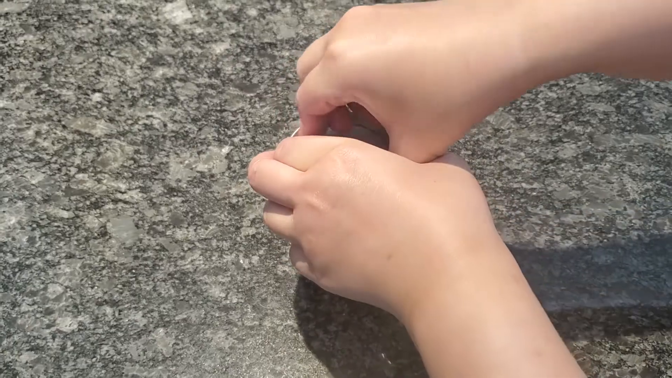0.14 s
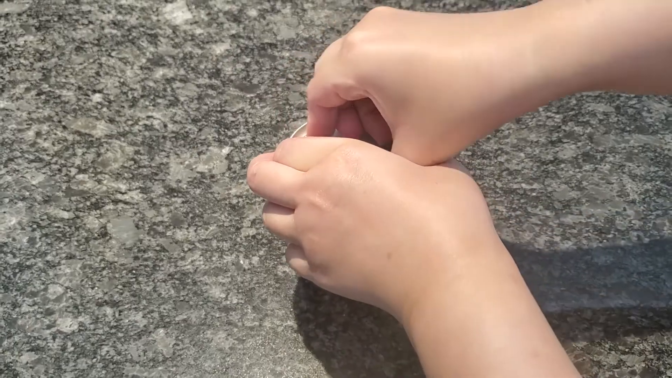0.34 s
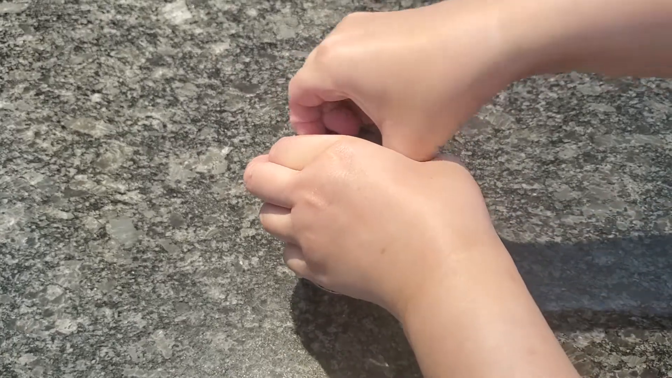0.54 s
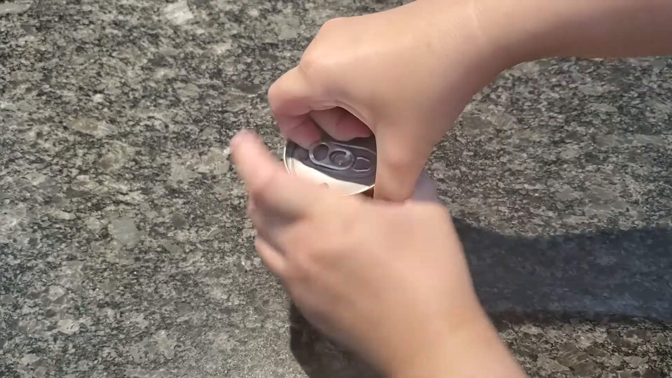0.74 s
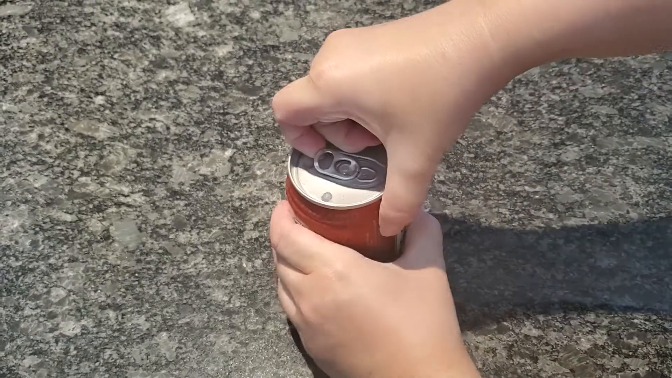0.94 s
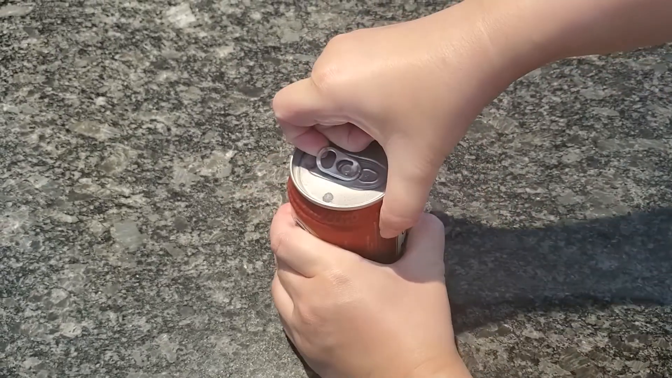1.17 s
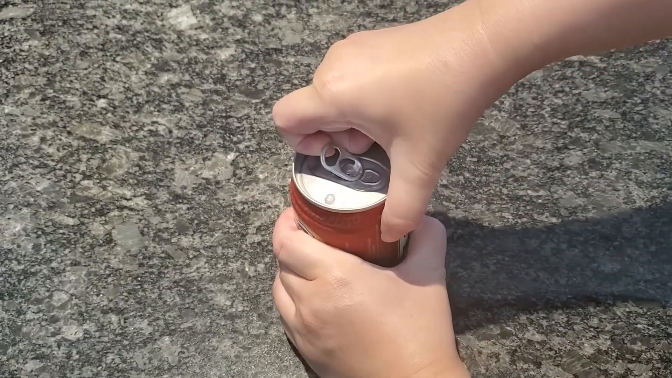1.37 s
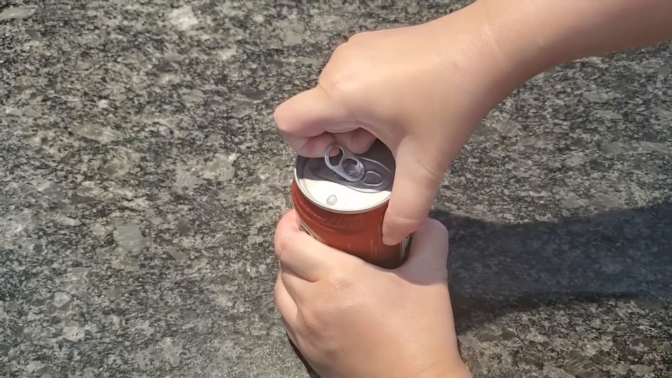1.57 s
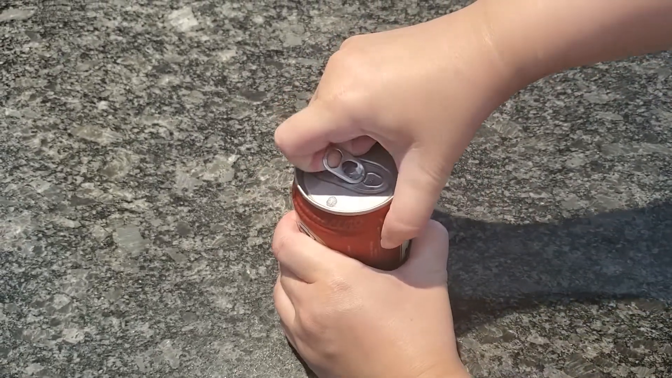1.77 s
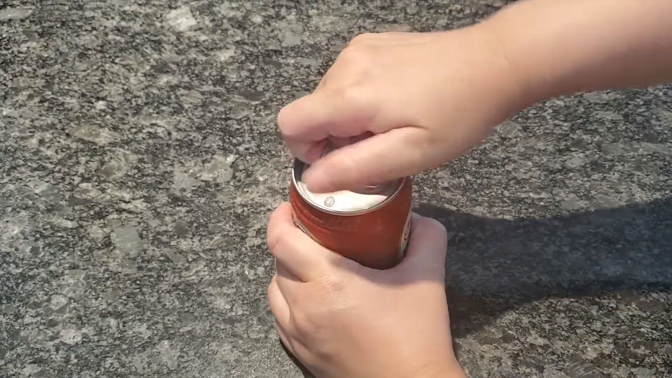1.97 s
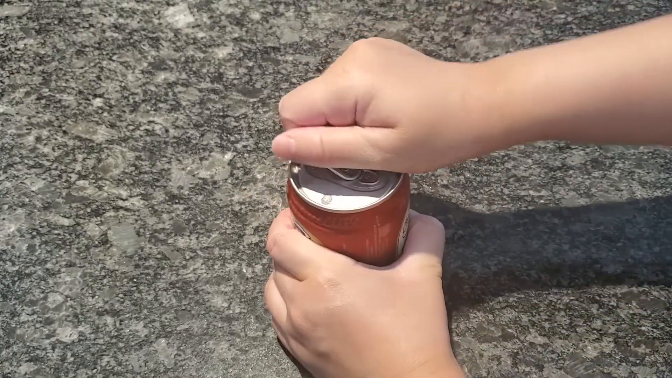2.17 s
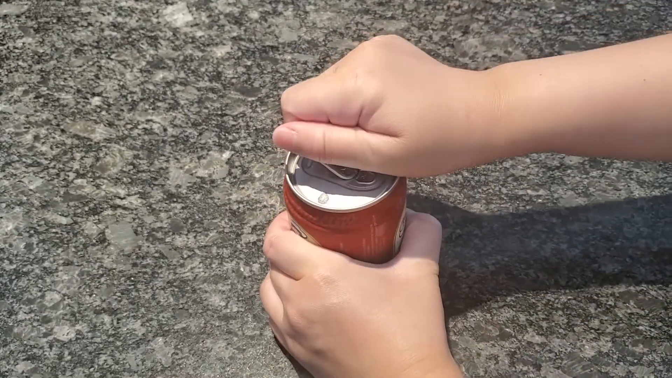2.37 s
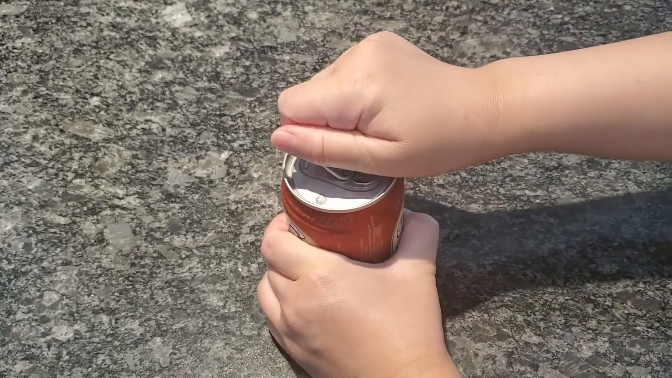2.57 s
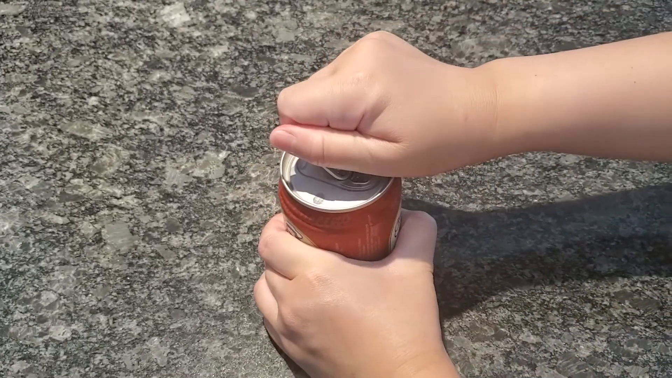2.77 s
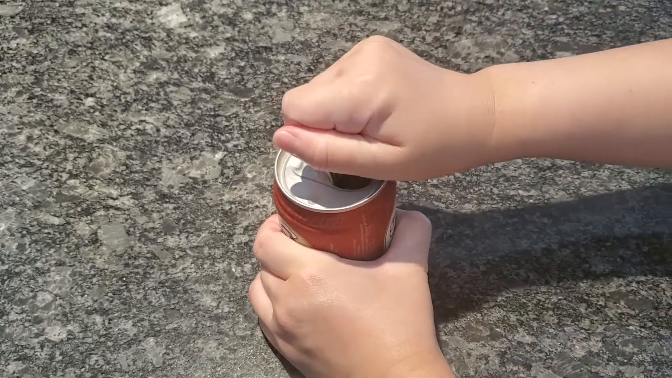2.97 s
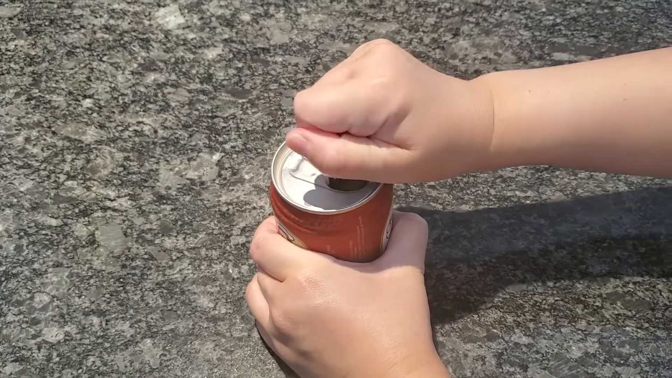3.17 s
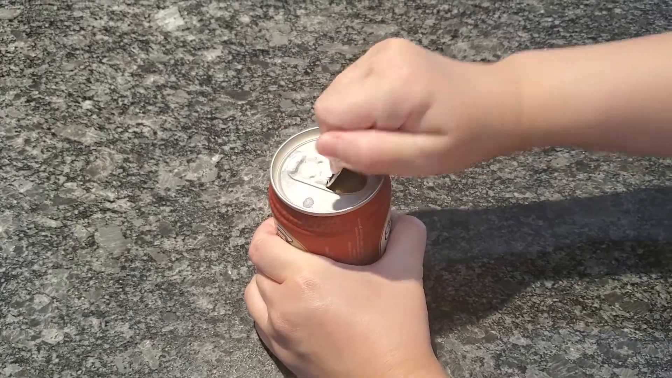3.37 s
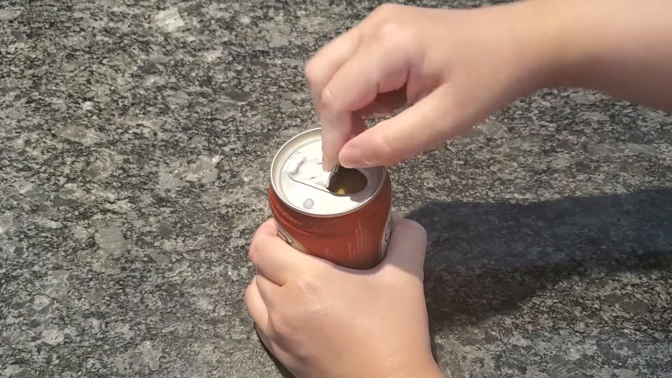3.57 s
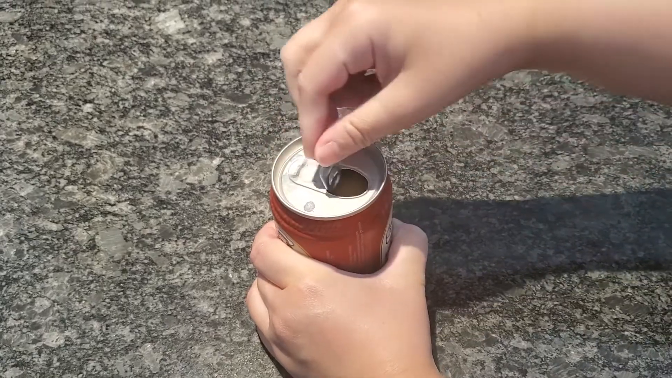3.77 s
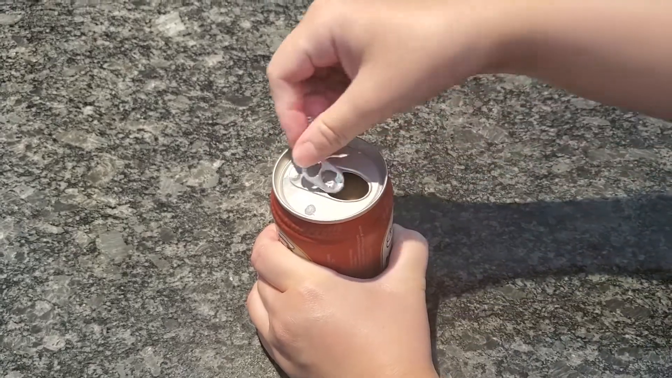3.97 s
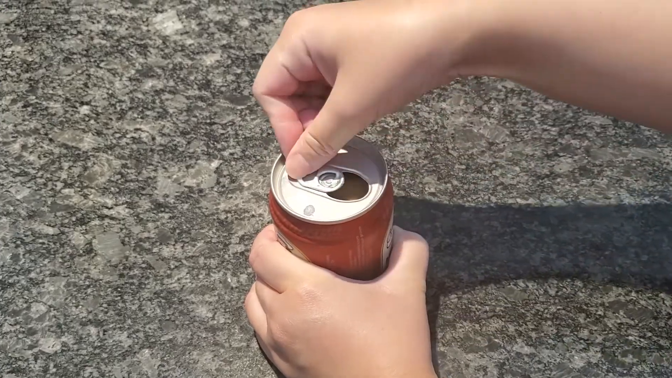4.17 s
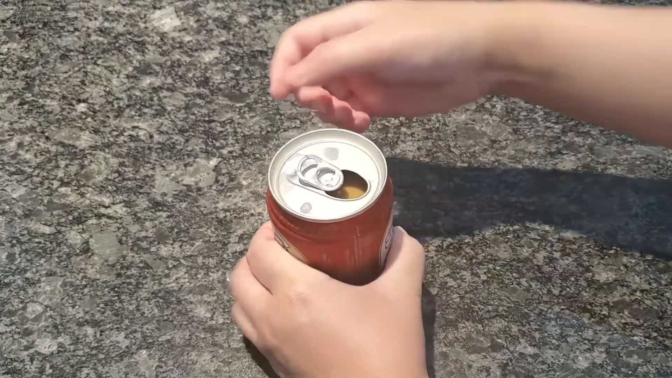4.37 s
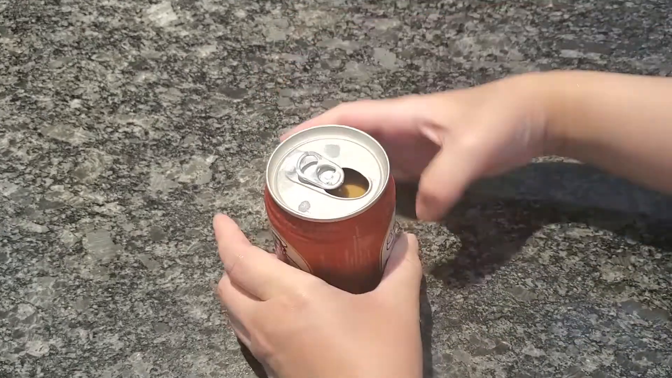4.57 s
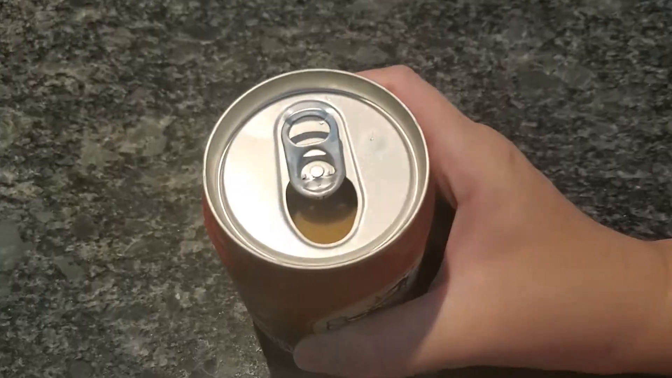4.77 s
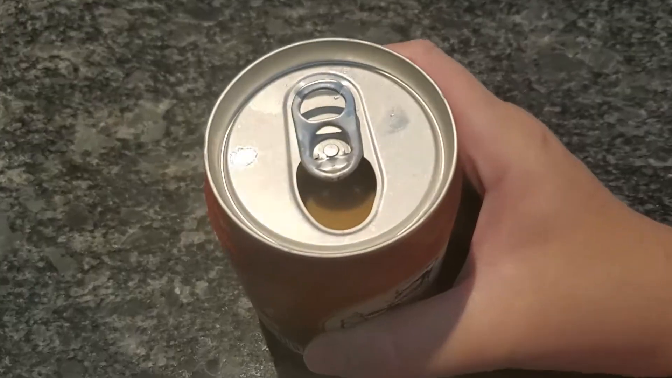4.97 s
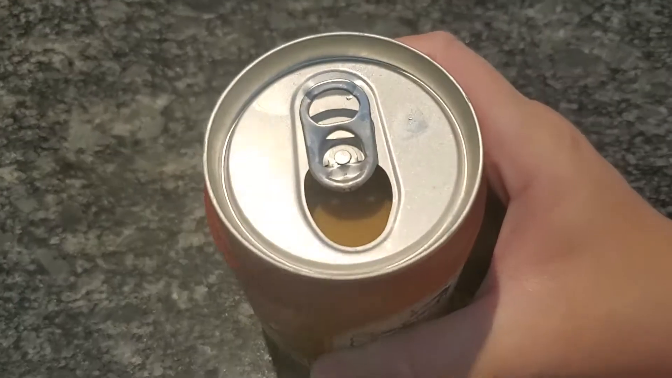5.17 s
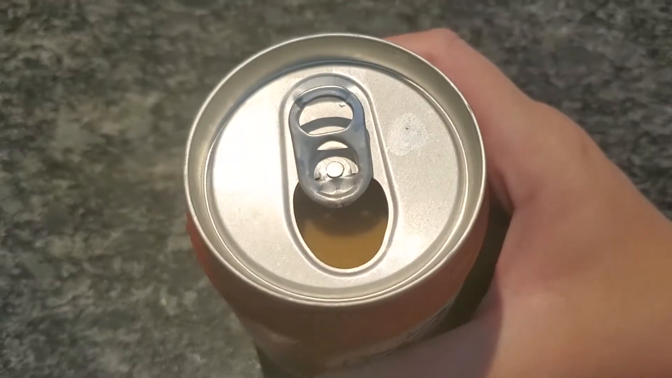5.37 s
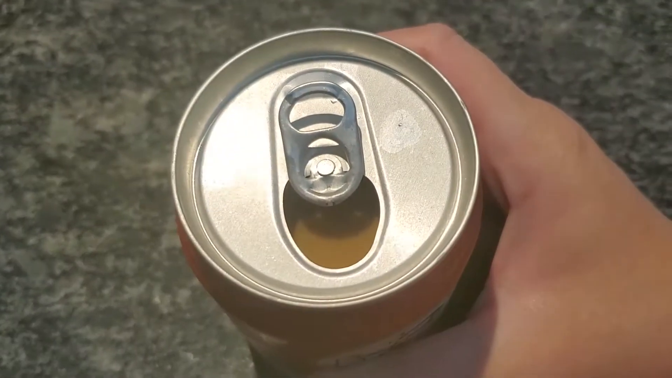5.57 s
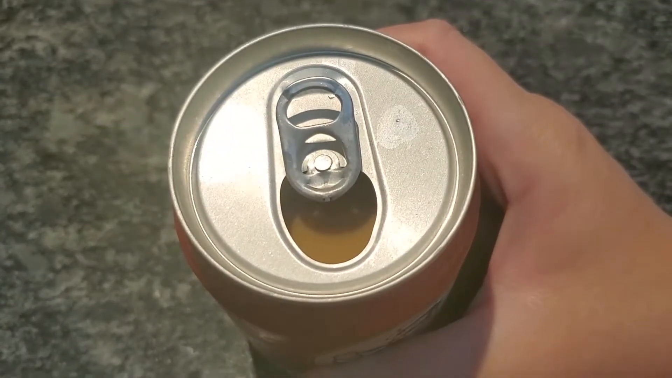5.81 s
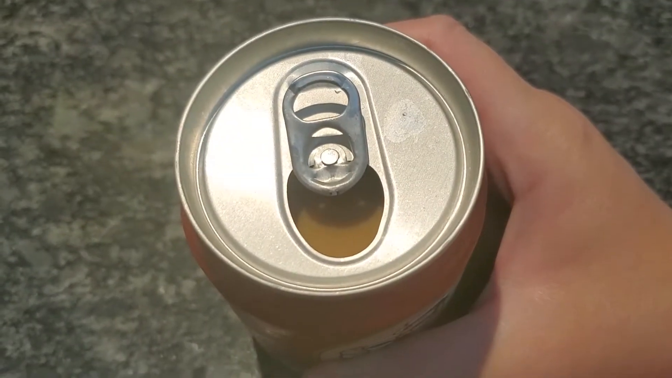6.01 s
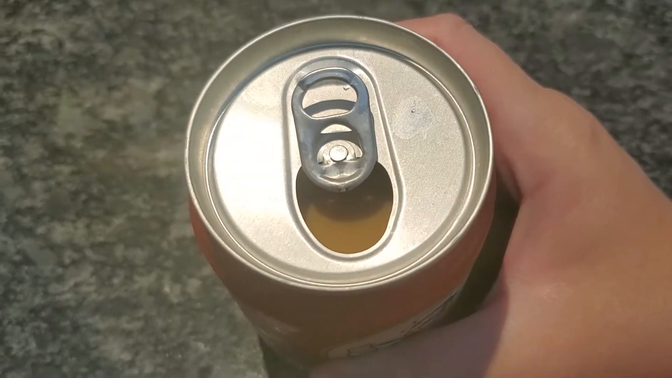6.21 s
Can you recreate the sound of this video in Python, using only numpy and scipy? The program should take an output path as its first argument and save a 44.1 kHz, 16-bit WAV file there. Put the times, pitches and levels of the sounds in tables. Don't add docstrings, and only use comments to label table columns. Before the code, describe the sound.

A drink can is opened close up: nail ticks on the tab, a sharp pop with a brief gas spit, crackling metal tear, then faint ticks over a low drone.

```python
import sys
import numpy as np
from scipy import signal
from scipy.fft import rfft, irfft, next_fast_len
from scipy.io import wavfile
from scipy.ndimage import map_coordinates

SR = 44100
rng = np.random.default_rng(int(sys.argv[2]) if len(sys.argv) > 2 else 0)


def gain_from_decibels(decibels):
    exponent = np.asarray(decibels, float) / 20
    return 10 ** exponent


def wav_out(sig):
    wavfile.write(sys.argv[1], SR, np.round(np.clip(np.atleast_2d(sig).T, -1, 1) * 32767).astype(np.int16))


N = 275437

# pitch_hz, lead [radians]
PORT_LEAD = [(200, 0), (340, -.3), (600, -2), (1200, -4)]


def unit(x):
    return x / np.sqrt(np.mean(x ** 2) + 1e-20)


def along(points, hz):
    f, v = np.transpose(points)
    return np.interp(np.log(hz + 1), np.log(f + 1), v)


def curve(rows, column):
    rows = np.array(rows)
    return np.interp(np.arange(N) / SR, rows[:, 0], rows[:, column])


def wobble(rate):
    coarse = np.arange(0, N + 16, 16)
    knots = rng.standard_normal(int(N * rate / SR) + 4)
    return np.interp(np.arange(N), coarse, map_coordinates(knots, [coarse * rate / SR]))


def swell(peak_s, rise_s, fade_s):
    t = np.arange(N) / SR - peak_s
    return -20 * np.where(t < 0, -t / rise_s, t / fade_s)


def filtered(x, response):
    m = next_fast_len(N + SR // 2)
    return irfft(rfft(x, m) * response(np.fft.rfftfreq(m, 1 / SR)), m)[..., :N]


def modes(table, flip=-1):
    def response(f):
        total = 0
        for k, (hz, width, db) in enumerate(table):
            total = total + flip ** k * gain_from_decibels(db) * 1j * f * width / (hz * hz - f * f + 1j * f * width)
        return total
    return response


def coloured(points):
    return lambda hz: gain_from_decibels(along(points, hz))


def narrow(hz, width):
    return lambda f: 1 / (1 + ((f - hz) / width * 2) ** 2)


def noise(gain, alike):
    def spread(hz):
        turn = np.arccos(np.clip(along(alike, hz), -1, 1)) / 2
        return gain(hz) * [np.cos(turn), np.sin(turn)]

    mid, side = filtered(rng.standard_normal((2, N)), spread)
    stereo = np.array([mid + side, mid - side])
    return unit(filtered(stereo, lambda hz: np.exp(1j * np.outer([1, 0], along(PORT_LEAD, hz)))))


def contacts(events, body, length, edge_db, ring, apart, pan_db, snap=1.1, detune=.035, flip=-1):
    low_apart = .45
    dull_hz = 15000
    out, t = np.zeros((2, N + SR)), np.arange(2048) / SR
    hz = np.fft.rfftfreq(len(t), 1 / SR)
    low_modes = [m for m in body if m[0] <= 7000]
    edge_modes = [m for m in body if m[0] > 7000]
    port_spread = apart * np.reshape([low_apart, 1], (2, 1, 1))
    for s, db, tone_hz, tone_db in events:
        rough = rng.standard_normal((3, len(t)))
        bent = hz * (1 + detune * rough[0, 0])
        upper = np.array([modes(group, flip)(bent) for group in (low_modes, edge_modes)])
        upper = upper / (1 + 1j * hz / dull_hz) ** 2
        rough[0, :6] = [snap, 0, 0, 0, 0, 0]
        force = (rough[0] + port_spread * rough[1:]) * gain_from_decibels(-60 * t / length)
        parts = irfft(rfft(force) * upper[:, None])
        parts[..., -256:] = 0
        parts /= np.abs(parts).max(axis=(1, 2), keepdims=True)
        age = t / (ring * length)
        bloom = (age * np.exp(1 - age)) ** 1.6
        tone = bloom * np.sin(2 * np.pi * tone_hz * t + 0.092 * rough[1:, :1]) * gain_from_decibels([[pan_db], [-pan_db]])
        hit = parts[0] + gain_from_decibels(edge_db) * parts[1] + gain_from_decibels(tone_db) * tone
        out[:, round(s * SR):][:, :len(t)] += gain_from_decibels(db) * hit
    return out[:, :N] * gain_from_decibels([[pan_db / 2], [-pan_db / 2]])


def plucks():
    # start_s, peak level_db, lid pitch_hz, tone level_db
    nail_hits = [(.002, -47, 1660, 6), (.008, -69.5, 840, 15), (.013, -42.5, 1750, 1.5),
                 (.2815, -52, 6300, 0), (.2852, -44.5, 1610, 1.5), (.2875, -47.5, 810, 0),
                 (.291, -43.5, 1760, 8.5), (.381, -62, 1790, 12.5), (.6275, -49, 1790, 6),
                 (.6285, -60.5, 2560, 8.5), (.632, -56.5, 3317, 2.5), (1.029, -71, 4930, 10.5),
                 (1.058, -66, 1636, 4.5), (1.06, -73.5, 925, 14)]
    # pitch_hz, width_hz, level_db
    shut_lid = [(2250, 400, -6), (2840, 110, -3), (3300, 610, -5), (3533, 260, 2), (4470, 510, -9.5),
                (5950, 630, -4.5), (6600, 670, -0.5), (8400, 700, -4), (10200, 620, 4.5),
                (11390, 2300, -1.5), (14345, 870, -6.5)]
    return contacts(nail_hits, shut_lid, 0.007, edge_db=-2.5, ring=0.21, apart=0.69, pan_db=-0.8)


def squeal(db, pitch):
    t = np.arange(N) / SR
    fade_s, blur_hz = 0.0086, 90
    fade = np.clip(np.minimum(t - pitch[0][0], pitch[-1][0] - t) / fade_s, 0, 1)
    return fade * gain_from_decibels(db) * np.sin(2 * np.pi * np.cumsum(curve(pitch, 1) + blur_hz * wobble(300)) / SR)


def skin():
    # firmest grip start_s, rustle level_db, wall ring level_db, rise_s, fade_s (for 20 dB)
    strokes = [(0, -53.5, -81, .1, 0.095), (.3, -59, -68.5, 0.071, 0.11), (.72, -72, -100, 0.19, 0.19),
               (0.831, -59, -64, 0.067, 0.052), (1.712, -58.5, -82, 0.015, 0.09),
               (1.799, -76, -77.5, 0.11, 0.21), (2.069, -73.5, -90, 0.047, .4),
               (2.22, -72, -72.5, 0.1, 0.14), (3.64, -77, -102, 0.22, 0.57),
               (4.06, -67.5, -69, 0.023, 0.089), (4.25, -73, -83, 0.14, 0.11),
               (4.48, -78.5, -84, 0.22, 0.27), (4.59, -78, -94, 0.28, 0.071), (5.05, -78.5, -86, 0.19, .5)]
    # pitch_hz, level_db
    skin_colour = [(500, -12), (900, -0.5), (1400, 1.5), (1750, -2), (2100, -8), (2900, -11.5), (3500, -14),
                   (5000, -14), (9000, -19.5), (12600, -18.5), (14500, -15.5), (16000, -18.5)]
    # (start_s, pitch_hz)
    squeak_paths = [
        (-65, [(.6, 14800), (.612, 15000), (.635, 15080), (.655, 15320), (.685, 15100), (.705, 15150), (.72, 15500)]),
        (-71, [(.945, 15200), (.968, 14950), (.977, 14600)]),
        (-77, [(5.1, 12250), (5.13, 13100), (5.17, 13700), (5.19, 13400), (5.23, 13450), (5.32, 12950), (5.39, 12700), (5.415, 12800), (5.48, 12300)]),
        (-88, [(5.15, 5100), (5.25, 5250), (5.4, 5100)]),
        (-76, [(5.115, 8550), (5.14, 9000), (5.18, 9200)]),
        (-76, [(5.19, 9550), (5.21, 9850), (5.245, 9970), (5.3, 9600), (5.355, 8900)]),
    ]
    rustle, ring = 0, 0
    for s, rustle_db, ring_db, rise_s, fade_s in strokes:
        grip = gain_from_decibels(swell(s, rise_s, fade_s))
        rustle = rustle + gain_from_decibels(rustle_db) * grip
        ring = ring + gain_from_decibels(ring_db) * grip
    rub = rustle * noise(coloured(skin_colour), [(1000, 1.0)]) + ring * noise(narrow(2530, 330), [(1000, 0.67)])
    brush = gain_from_decibels(-66 + swell(.815, rise_s=.5, fade_s=.07))
    rub = rub + brush * noise(narrow(12500, 5000), [(1000, .4)])
    squeak = gain_from_decibels(3.9 * wobble(63)) * sum(squeal(*row) for row in squeak_paths)
    return gain_from_decibels(1.1 * wobble(83)) * rub, squeak * gain_from_decibels([[1.2], [-1.2]])


def hum(hz, wander, db):
    turn = 2 * np.pi * np.cumsum(hz + wander / 3 * wobble(13)) / SR + np.outer([1, 0], along(PORT_LEAD, hz))
    unsteady_db = .6 * wobble(15) + 1.8 * np.array([wobble(7), wobble(7)])
    return gain_from_decibels(db + 5.5 + unsteady_db) * np.sin(turn)


def whine(s, hz, db, fade_s):
    rise_s, wander_hz = .25, 22
    return gain_from_decibels(db + swell(s, rise_s, fade_s)) * np.sin(2 * np.pi * np.cumsum(hz + wander_hz * wobble(56)) / SR)


def background():
    # start_s, level_db
    load = [(0, 0), (.6, -1.5), (1.1, 0), (1.7, -2), (2.2, -3), (2.8, 1), (3.3, -3.5), (3.9, -4.5),
            (4.4, -1), (6.25, -2.5)]
    # pitch_hz, level_db
    rumble_colour = [(15, -65), (25, -38.5), (48, -14.5), (157, -12.5), (183, -3.5), (217, -13),
                     (284, -4.5), (321, -6), (353, -4.5), (387, -10), (426, -11.5), (461, -16), (620, -20),
                     (810, -57), (1360, -120)]
    # pitch_hz, wander_hz, rms level_db
    hum_tones = [(61.5, 7.3, -78.5), (140, 22, -74.5), (192, 7, -66.5), (241.3, 9.9, -72),
                 (291, 5.5, -70.5), (356.3, 3.3, -61), (376, 2, -73.5), (419, 7, -69), (452, 6.6, -78.5),
                 (718, 5.8, -71), (947, 19, -87.5), (980, 7.6, -87), (1190, 40, -75), (1285, 2.3, -85.5)]
    # pitch_hz, level_db
    whirr_colour = [(260, -34), (450, -3.5), (760, -9.5), (972, -11), (1060, -17.5), (1220, -18.5),
                    (1240, -24), (2200, -41.5), (2860, -68.5), (4840, -120)]
    # start_s, pitch_hz, level_db, fade_s (for 20 dB)
    whine_tones = [
        (4.47, 3500, -85, .15),
        (4.7, 3500, -86, 2.5),
        (4.95, 950, -75, 8),
    ]
    # pitch_hz, level_db
    hiss_colour = [(1400, -17.5), (1900, -15.5), (3400, -14), (4600, -18.5), (5500, -4.5), (6800, -0.5),
                   (8400, -5.5), (9000, -11), (11800, -19.5), (12400, -23), (15700, -26.5), (16000, -62.5)]
    # pitch_hz, likeness [0-1]
    likeness = [(60, 0.41), (130, 0.93), (290, 0.58), (640, 0.21), (1400, 0.37), (3000, 0.069),
                (15000, 0.045)]
    load_db = curve(load, 1)
    rumble = gain_from_decibels(-58) * noise(coloured(rumble_colour), likeness)
    drone_db = -1 + load_db + 0.93 * wobble(3.6) + [[.6], [-.6]]
    drone = gain_from_decibels(drone_db) * (sum(hum(*row) for row in hum_tones) + rumble)
    whirr_db = -63.5 + 0.94 * load_db + 0.57 * wobble(2.5)
    whirr = gain_from_decibels(whirr_db) * noise(coloured(whirr_colour), likeness)
    whines = sum(whine(*row) for row in whine_tones)
    hiss = gain_from_decibels(-72 + 0.49 * load_db) * noise(coloured(hiss_colour), likeness)
    return drone + whirr + whines + hiss


def thumps():
    # start_s, pitch_hz, level_db, t60_s
    knocks = [
        (.29, 270.3, -43.5, 0.39),
        (0.299, 55, -54, 0.46),
        (0.312, 94, -42, 0.066),
        (0.632, 86, -61.5, 0.32),
        (1.229, 697, -43.5, .03),
        (1.229, 331, -45, 0.046),
        (1.231, 69.7, -49, 0.11),
        (2.241, 75.4, -53.5, 0.22),
        (2.885, 109, -50.5, 0.24),
        (2.92, 56.4, -49, 0.56),
    ]
    out, t = np.zeros(N + SR), np.arange(SR // 2) / SR
    for s, hz, db, t60 in knocks:
        ring = gain_from_decibels(db - 60 * t / t60) * (1 - np.exp(-t * hz)) * np.sin(2 * np.pi * hz * t)
        out[round(s * SR):][:len(t)] += ring
    return out[:N]


def seal_pop():
    # start_s, peak level_db, lid pitch_hz, tone level_db
    seal_cracks = [
        (1.2013, -18, 1600, -4.5),
        (1.2018, -25.5, 5553, 3),
        (1.2291, -14, 1600, -9.5),
        (1.2298, -12, 2130, -6),
        (1.2303, -10, 1562, 1),
        (1.2347, -24.5, 1610, -1),
        (1.2358, -22, 2200, -4.5),
        (1.2385, -24, 1700, -5.5),
        (1.2432, -24, 2300, -4.5),
    ]
    # pitch_hz, width_hz, level_db
    taut_lid = [(1580, 180, 1.5), (2130, 350, 0.5), (2645, 220, 5), (3600, 230, 0), (4230, 230, -0.5),
                (5800, 300, -2), (6200, 260, -4), (7090, 180, -3), (8460, 260, -0.5), (9500, 260, -1.5),
                (10900, 300, -8.5), (12100, 400, -6.5), (13730, 460, -11), (14800, 500, -1.5)]
    return contacts(seal_cracks, taut_lid, 0.011, edge_db=-8.0, ring=0.071, apart=0.41, pan_db=-1.05,
                    snap=2.6, detune=.006, flip=0.97)


def gas():
    # pitch_hz, level_db
    jet_colour = [(100, -15), (700, -24.5), (1500, -14.5), (3000, -10), (5000, -14), (7000, -9.5),
                  (8500, -14.5), (10500, -8), (11500, -4), (12000, 1), (12600, -4), (13600, -7),
                  (14600, -0.5), (15400, -5.5), (16200, -8)]
    opening_s, hold_s, closing_s = .021, 0.004, 0.014
    leak_db, leak_t60_s = -22.5, .08
    t = np.arange(N) / SR - 1.228
    shut_s = opening_s + hold_s
    jet = np.clip(np.minimum(t / opening_s, 1 - (t - shut_s) / closing_s), 0, 1) ** 0.37
    leak = (t > shut_s) * gain_from_decibels(leak_db - 60 * np.abs(t - shut_s) / leak_t60_s)
    flutter_db = 1.2 * wobble(400)
    return (jet + leak) * gain_from_decibels(-20.5 + flutter_db + [[-1.1], [1.1]]) * noise(coloured(jet_colour), [(1000, 0.34)])


def rivet_clicks():
    # start_s, peak level_db, tab pitch_hz, tone level_db
    clicks = [
        (1.4897, -43, 2590, -11.5),
        (1.5152, -35.5, 1830, -14),
        (1.5343, -26, 4800, -7),
        (1.5352, -30, 5500, -8),
        (1.553, -39, 6200, -8),
        (1.7095, -50, 5300, 0),
        (1.7262, -47, 5400, -2),
        (1.7278, -44.5, 2550, -3),
        (1.543, -41, 4900, -14),
    ]
    # pitch_hz, width_hz, level_db
    lifted_tab = [(1520, 440, -13), (2050, 320, -8.5), (2590, 110, 7.5), (3600, 300, -5), (4230, 250, -7),
                  (5100, 400, -5.5), (5630, 350, 0), (5950, 420, 9), (6700, 250, -4), (7800, 300, -3),
                  (8850, 400, 5), (10000, 250, 0), (11300, 400, -8), (12900, 500, -10)]
    return contacts(clicks, lifted_tab, 0.0064, edge_db=-6.5, ring=0.12, apart=0.6, pan_db=-1.4,
                    snap=5, detune=0.0047, flip=0.92)


def tearing():
    # start_s, peak level_db, lid pitch_hz, tone level_db
    cracks = [
        (2.637, -27, 2172, -8),
        (2.6408, -23.5, 1960, -10.5),
        (2.6638, -16.5, 2150, -1),
        (2.6648, -19, 4182, 2.5),
        (2.8005, -36.5, 2510, -2),
        (2.8142, -18, 2040, -6),
        (2.8848, -1.5, 2197, -11),
        (2.888, -4, 2214, -12.5),
        (2.891, -20.5, 2818, -8.5),
    ]
    score_slips = [(2.5844, -49.5, 2210, -2.5), (2.593, -54, 4100, -1.5), (2.599, -60, 2200, -5.5),
                   (2.6035, -58.5, 2300, -1), (2.615, -53, 2170, -3.5), (2.622, -51.5, 2140, -3),
                   (2.6293, -40.5, 2400, -12.5), (2.6315, -43.5, 2120, -1), (2.6452, -21.5, 2010, -7.5),
                   (2.6456, -28, 4140, 2.5), (2.6468, -23, 2120, -4), (2.6488, -24, 4150, 1),
                   (2.6524, -28, 4150, -4.5), (2.6595, -31, 2500, -3.5), (2.6775, -30.5, 2780, -1),
                   (2.8895, -19, 2900, 0.5), (2.6508, -30, 1960, -4.5), (2.6548, -29.5, 2200, -2),
                   (2.6566, -26, 2700, -8), (2.6655, -20, 2150, -6.5), (2.672, -30.5, 2190, 1),
                   (2.6746, -28, 2770, -1.5), (2.6802, -30, 3000, -6.5), (2.6843, -36, 2670, 0.5),
                   (2.6895, -38, 2080, 2.5), (2.693, -29.5, 2090, -9.5), (2.8022, -35, 2400, -1),
                   (2.8239, -37.5, 2360, -0.5), (2.827, -42, 2000, 8), (2.8317, -41, 2080, 3.5),
                   (2.8379, -30, 2100, -6.5), (2.8398, -32, 4385, 9.5), (2.841, -24, 2150, -3),
                   (2.8498, -29, 2000, 0.5), (2.8511, -27, 1960, 1.5), (2.8566, -19.5, 2250, 3),
                   (2.8578, -17.5, 2500, 4), (2.8587, -13.5, 2405, 3), (2.8617, -19, 1990, 3),
                   (2.8664, -16.5, 2360, -6), (2.8693, -15, 2510, -4.5), (2.8732, -23, 2620, 3),
                   (2.876, -25.5, 2338, 0), (2.8787, -18.5, 2260, 0), (2.8807, -19, 2171, -7),
                   (2.8838, -15.5, 2867, -1.5), (3.054, -26.5, 2200, -20)]
    # pitch_hz, width_hz, level_db
    torn_lid = [(1450, 496, -11), (2450, 250, -9), (2901, 160, -0.5), (3490, 150, 1), (4150, 260, 1.5),
                (4500, 330, -0.5), (6020, 490, 3), (7100, 350, -2), (7790, 300, 1.5), (8500, 350, -5.5),
                (10300, 620, -6.5), (11600, 420, -11), (13000, 600, -13.5), (14900, 900, -8.5)]
    sharp = contacts(cracks, torn_lid, 0.0081, edge_db=-2.5, ring=0.052, apart=1.0, pan_db=-0.5,
                     snap=3, detune=0.017, flip=1)
    dull = contacts(score_slips, torn_lid, 0.011, edge_db=-8.5, ring=0.071, apart=0.604, pan_db=-0.2,
                    snap=2.5, detune=.016, flip=1)
    return sharp + dull


def kicked_air(pushes, air):
    kick, t = np.zeros((2, N)), np.arange(SR // 2) / SR
    for s, db, t60 in pushes:
        rough = rng.standard_normal((3, len(t)))
        push = gain_from_decibels(db + 17.5 - 60 * t / t60) * (rough[0] + .7 * rough[1:])
        kick[:, round(s * SR):][:, :len(t)] += push * gain_from_decibels([[.8], [-.8]])
    return filtered(kick, lambda f: modes(air)(f) * f ** 2 / (f ** 2 + 500 ** 2))


def flap():
    # start_s, level_db, t60_s
    slit_pushes = [
        (2.646, -45, 0.021),
        (2.664, -40.5, 0.018),
        (2.814, -47.5, .02),
        (2.857, -37.5, 0.09),
    ]
    # pitch_hz, width_hz, level_db
    slit_air = [(640, 170, 1)]
    # start_s, level_db, t60_s
    free_pushes = [
        (2.884, -17.5, 0.028),
        (2.89, -35.5, 0.39),
    ]
    # pitch_hz, width_hz, level_db
    open_air = [(740, 160, -7), (905, 110, -0.5), (1015, 77, -1.5), (1300, 380, -12.5)]
    return kicked_air(slit_pushes, slit_air) + kicked_air(free_pushes, open_air)


def fold_back():
    # start_s, peak level_db, lid pitch_hz, tone level_db
    tab_ticks = [(3.229, -45, 1940, -18.5), (3.25, -55.5, 1210, 1.5), (3.251, -55, 2050, -2.5),
                 (3.28, -62, 1300, 4), (3.53, -77, 2090, 1), (3.586, -72.5, 1319, 13.5),
                 (3.6, -71, 1360, 9), (3.603, -72, 2170, 4), (3.607, -66.5, 1310, 8), (3.715, -81, 1810, 9),
                 (4.045, -67, 1450, 11), (4.053, -55, 2600, -3), (4.0575, -42, 1290, -7),
                 (4.06, -52, 1500, -2), (4.058, -51, 1950, -5), (4.064, -54.5, 763, -0.5),
                 (4.2158, -58, 2680, -8), (4.217, -60, 1320, 3), (4.241, -71, 1740, 9),
                 (4.2455, -64, 1700, 7.5), (4.25, -69, 1700, -1), (4.63, -68, 1304, 6.5)]
    # pitch_hz, width_hz, level_db
    open_lid = [(2150, 130, -5), (1800, 250, -1), (2770, 170, -1), (3500, 240, 5.5), (3130, 430, -8.5),
                (4500, 400, -9), (6140, 760, -12), (8240, 2000, 19), (10820, 1400, 3)]
    return contacts(tab_ticks, open_lid, 0.014, edge_db=-5.5, ring=0.23, apart=0.32, pan_db=-1.5)


def room(x):
    # pitch_hz, t60_s, level_db
    decay = np.array([(200, .5, -6), (900, .55, -0.5), (1600, .6, -6), (3000, 0.48, -3.5), (5000, .5, -4.5),
                      (8000, .38, -9), (11000, .36, -6.5), (15000, 0.26, -9.5)])
    # start_s, level_db
    echoes = [(.0047, -20), (.0092, -8), (0.015, -11.5), (0.018, -14.5), (.027, -26)]
    shared = 0.25
    hz, t, z = signal.stft(rng.standard_normal((2, SR * 3 // 4)), SR, nperseg=256)
    t60, db = (along(decay[:, [0, k]], hz)[:, None] for k in (1, 2))
    tail = signal.istft(z * gain_from_decibels(db - 60 * t / t60) / np.sqrt(t60 * SR / 14), SR, nperseg=256)[1]
    tail[1] = shared * tail[0] + np.sqrt(1 - shared ** 2) * tail[1]
    tail *= 1 - np.exp(-np.arange(tail.shape[1]) / SR / 0.005)
    for s, echo_db in echoes:
        for ear, late in zip(tail, rng.integers(0, 12, size=2)):
            ear[round(s * SR) + late:][:5] += gain_from_decibels(echo_db) * np.hanning(7)[1:-1] / 3
    return signal.fftconvolve(x, tail, axes=1)[:, :N]


def ports(x):
    # pitch_hz, left lead [radians], left-right level_db
    shading = np.array([(650, .6, -2), (1000, -1.4, -1), (1500, -.3, -4), (2100, 0, 0), (2800, -.5, 2),
                        (3600, -1.3, -2), (4500, -2.3, 2), (5500, -2.6, -3), (6500, -1.6, -3),
                        (8700, -2, -1), (10200, -4.2, 2), (12000, -4.5, 0), (14200, -7, -2)])
    lead, db = (shading[:, [0, k]] for k in (1, 2))

    def half_difference(hz):
        return np.exp(np.outer([.5, -.5], 1j * along(lead, hz) + np.log(gain_from_decibels(along(db, hz)))))
    return filtered(x, half_difference)


def scene():
    rub, squeak = skin()
    pop, rivet, ticks = seal_pop(), rivet_clicks(), fold_back()
    free = plucks() + tearing() + flap() + gas() + rub + gain_from_decibels(-15) * squeak
    cupped = pop + gain_from_decibels(-9.5) * rivet
    escaped = filtered(cupped, lambda f: gain_from_decibels(-1.5) / (1 + (1350 / (f + 1)) ** 8))
    held_ticks = gain_from_decibels(-5) * ticks
    near = pop + rivet + ticks + free
    return ports(near) + room(escaped + held_ticks + free) + squeak + thumps() + background()


def band_limit(x):
    return signal.sosfilt(signal.butter(12, 16960, fs=SR, output="sos"), x)


def record(dry):
    rounded = dry / (1 + np.abs(dry / .85) ** 4) ** (1 / 4)
    mix = filtered(rounded, lambda hz: np.clip((16250 - hz) / 600, 0, 1) ** 2)
    return band_limit(mix)


dry = scene()
out = record(dry)
wav_out(out)
```